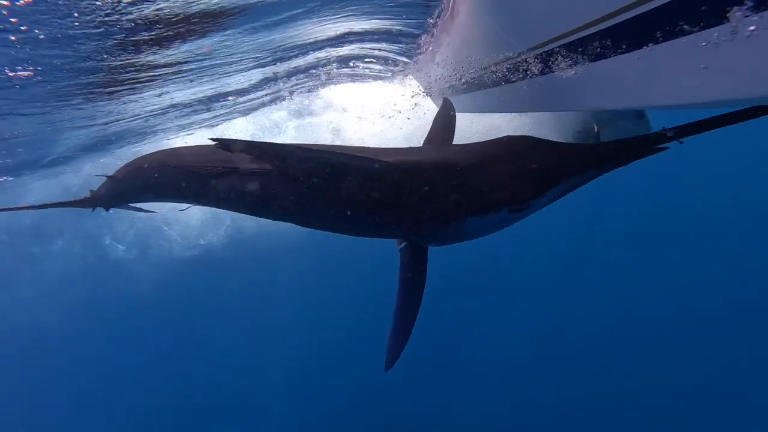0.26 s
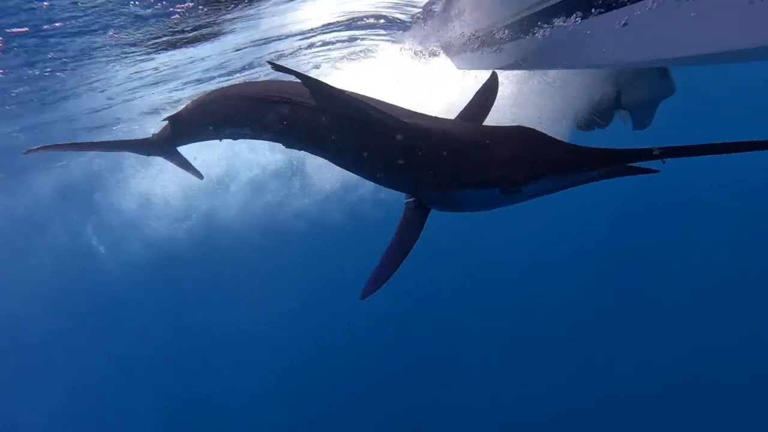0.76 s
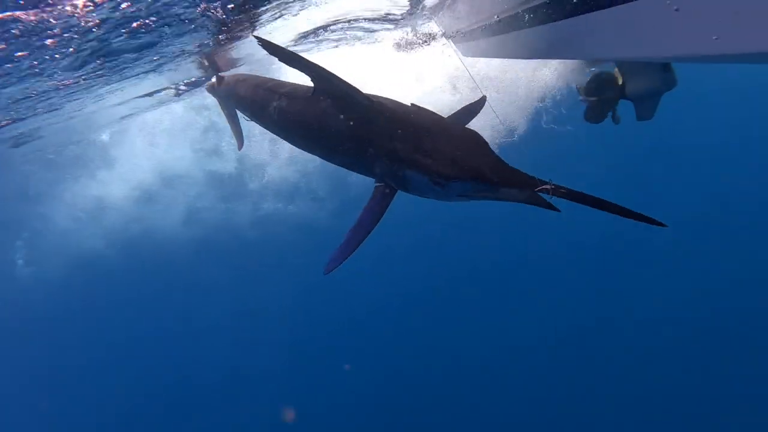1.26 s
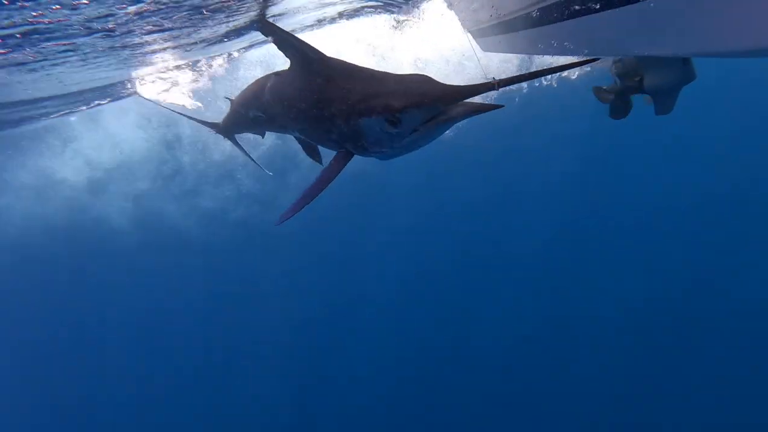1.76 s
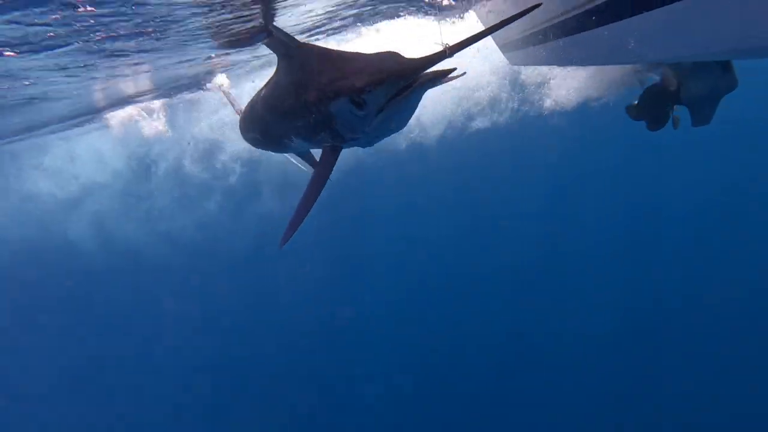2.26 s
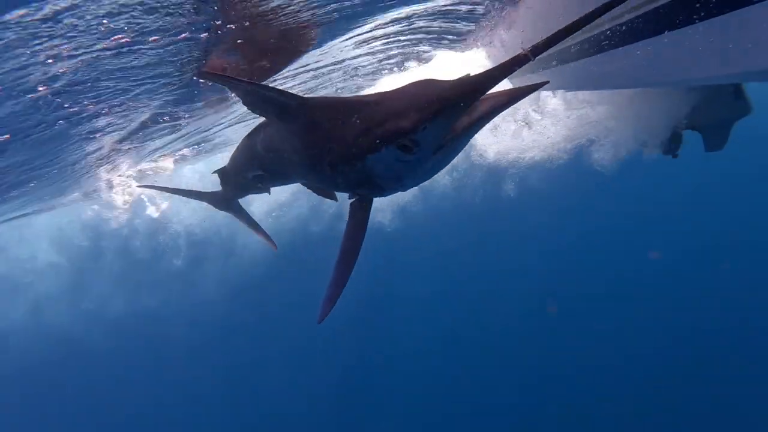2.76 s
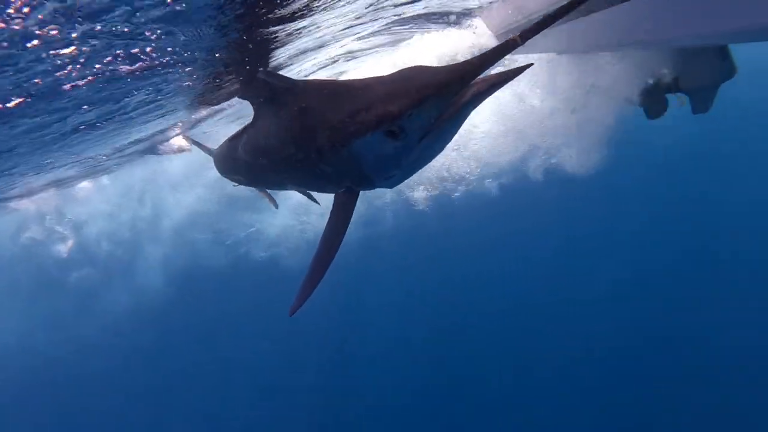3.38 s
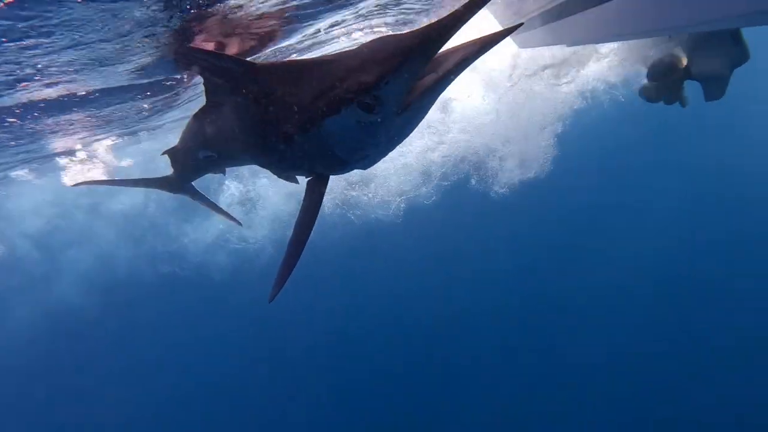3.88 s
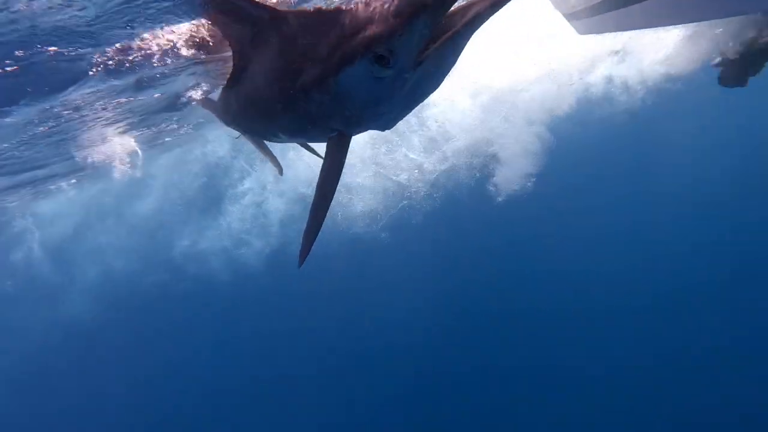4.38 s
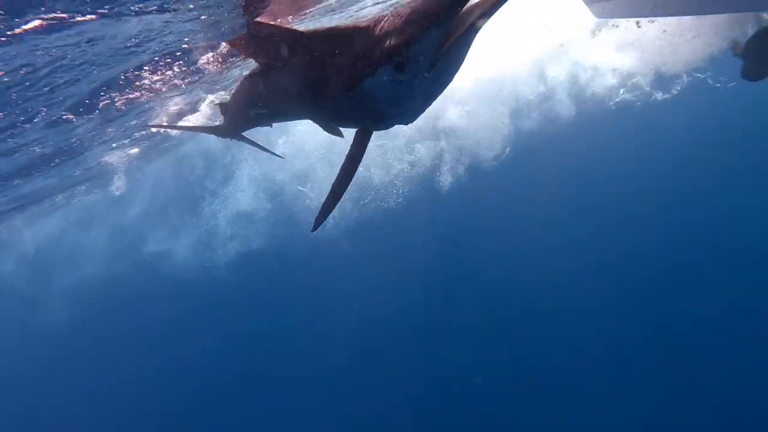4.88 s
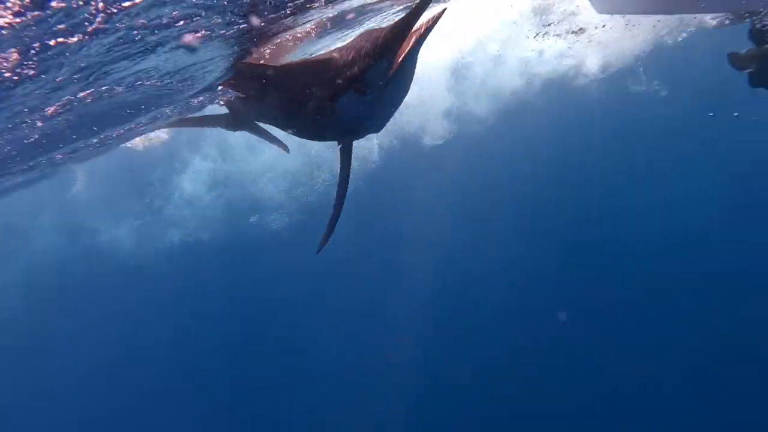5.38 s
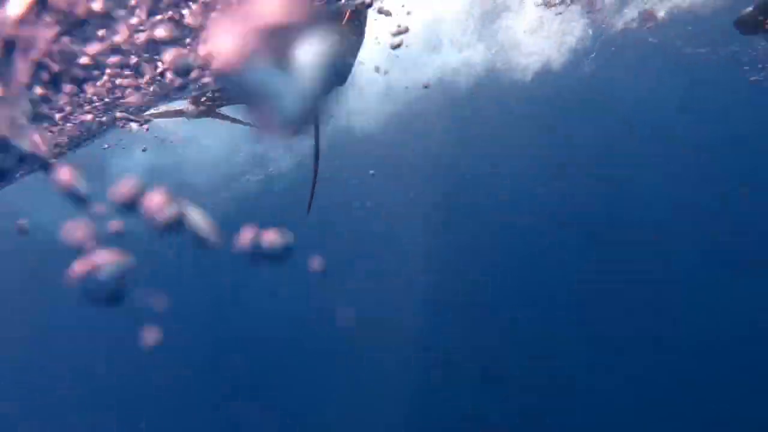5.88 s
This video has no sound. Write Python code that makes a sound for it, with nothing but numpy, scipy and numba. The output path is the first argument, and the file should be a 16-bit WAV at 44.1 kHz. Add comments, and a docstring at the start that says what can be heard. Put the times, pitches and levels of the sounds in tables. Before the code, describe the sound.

Close underwater sound, dull and centered: a steady low motor drone pulses rapidly through a boat hull, wrapped in turbulent water. Low buffeting thumps, rounded bubble plops and rising gurgles come and go irregularly. Light ticking spatters hit the microphone's casing, growing dense near the end with a rush of bubbles. An abrupt switch above water leaves a very short gust of wide stereo wind and hissing spray.

```python
"""Under water, from the start: an idling boat engine throbs and knocks through the hull as summed harmonics
and struck resonances. Water churns past as filtered noise and crowds of damped rings. Splashes spatter,
air pockets gurgle upward and single bubbles ring out; a sealed housing muffles it all alike in both channels.
At the end the sound cuts to the deck: wide wind and sea spray, as filtered noise in two channels."""
import sys
import numpy as np
from scipy import signal
from scipy.fft import rfft, irfft, next_fast_len
from scipy.io import wavfile
from scipy.ndimage import uniform_filter1d, minimum_filter1d
from numba import njit

SR = 44100
rng = np.random.default_rng(int(sys.argv[2]) if len(sys.argv) > 2 else 0)


def persist_wave(psi):
    """Save psi, clipped to +-1, as 16-bit WAV."""
    counts = np.round(np.clip(psi, -1, 1) * 32767).astype(np.int16)
    wavfile.write(sys.argv[1], SR, np.atleast_2d(counts).T)


N = 270761

# Levels are relative inside each source; spectrum tables set a shape only, as colour() restores the rms.

# slow hunting of the idle: t/s, f/Hz (turns per second)
IDLE_SPEED = [(0, 23.26), (.55, 23.33), (.9, 23.43), (1.35, 23.47), (1.85, 23.4), (2.05, 23.27),
              (2.55, 23.19), (2.85, 23.27), (3.2, 23.27), (3.4, 23.37), (3.65, 23.36), (4.05, 23.45),
              (4.6, 23.24), (4.8, 23.29), (5.15, 23.48), (5.5, 23.42), (6.14, 23.4)]
# engine hum through the hull: multiple of the turn rate, level/dB
HUM_HARMONICS = [(1, -18.5), (2, -31), (3, -29), (5, -44), (6, -37.5), (10, -38.5), (11, -38.5), (12, -42)]
# engine changes: t/s, throb level/dB, third multiple level/dB, upper hum level/dB, hull plate level/dB
ENGINE_LEVELS = [(0, -1, -1, 3.5, -9), (.5, -2, -1, -3, -11.5), (.75, 0.5, -2, 0.5, -7),
                 (1.3, 0.5, 4, 6.5, -3), (1.75, -0.5, 0, -3, -4.5), (2.25, 0.5, -2.5, 1.5, -6),
                 (2.6, -1.5, 3.5, 2.5, -1), (3, 2, 2, -4.5, -1), (3.3, 3, -10.5, 0, -1.5),
                 (3.8, -1.5, -9.5, 1.5, -12), (4.2, -3.5, 1.5, 0.5, -8), (4.75, -2, -11, 0, -7.5),
                 (5.2, 2.5, -2, -1.5, -13.5), (5.5, -3, -1, -5, -13), (5.96, -4, -4.5, -5.5, -3.5)]
# hull plate resonances: f/Hz, bandwidth/Hz, level/dB
HULL_PLATES = [(565, 28, -6), (653, 24, 0), (670, 160, -12), (773, 34, -5)]
# rush of water in the hull band: f/Hz, level/dB
RUSH_SPECTRUM = [(400, -6.5), (520, 9.5), (660, 16), (800, 14.5), (900, 5), (1100, -45), (2000, -86)]
# water around the housing: t/s, hull band level/dB, gurgle level/dB, fizz level/dB, crackle level/dB
WATER_LEVELS = [(0, -23.5, -24, -35, -65), (.6, -22.5, -28.5, -38.5, -72), (1.2, -23, -28.5, -39.5, -70.5),
                (1.8, -21.5, -33.5, -39, -70.5), (2.45, -24.5, -26, -38.5, -71),
                (3.0, -24, -28.5, -40, -71.5), (3.5, -22, -34, -35.5, -68), (4.05, -24, -24, -38, -70.5),
                (4.8, -23, -26.5, -36.5, -68), (5.1, -23.5, -27, -38, -70), (5.4, -22.5, -29, -38, -66),
                (5.7, -22.5, -36.5, -37, -69.5), (5.96, -32, -37.5, -36, -63.5)]
# surges that thump the housing: t/s, level/dB
SURGE_PUSHES = [(0.181, -22), (0.349, -25.5), (0.823, -25), (1.644, -26), (2.021, -33.5), (2.3, -32.5),
                (2.5, -30), (2.821, -25.5), (3.05, -30), (3.549, -33), (3.82, -20.5), (4.152, -24),
                (4.468, -18.5), (4.812, -24), (5.13, -26.5), (5.4, -33.5), (5.642, -23.5), (5.89, -23.5)]
# low buffeting: f/Hz, level/dB
BUFFET_SPECTRUM = [(8, -9.5), (20, -7.5), (50, 4), (130, -4.5), (200, -15.5), (400, -51), (800, -100)]
# large bubbles: f/Hz, level/dB
GURGLE_SPECTRUM = [(150, -1.5), (230, -11), (350, -3.5), (480, -1.5), (600, 2.5), (900, -30)]
# small bubbles: f/Hz, level/dB
FIZZ_SPECTRUM = [(700, -12), (950, -1), (1490, -6), (1650, -14.5), (1800, -37), (2500, -78)]
# smallest bubbles: f/Hz, level/dB
CRACKLE_SPECTRUM = [(1400, -21), (1750, 3), (2150, -8.5), (2450, -16.5), (4000, -12.5), (8000, -49),
                    (11000, -78.5)]
# hiss under the crackle: f/Hz, level/dB
WASH_SPECTRUM = [(1300, -51.5), (1750, -1.5), (1900, -5.5), (2070, 0.5), (2300, -18), (3000, -13),
                 (5000, -18.5), (9000, -19), (16000, -42)]
# sharp splashes on the housing: t/s, level/dB, treble level/dB re first level, mean delay of drops/s,
# housing ring level/dB re first level
HOUSING_SPLASHES = [(0.0464, -45, -13, 0.0021, -18), (0.3057, -50.5, -35.5, 0.0059, -8),
                    (0.3878, -53, -26, 0.0076, -0.5), (.5202, -51, -22, .007, 0.5),
                    (1.7295, -47, -22, .007, -1), (1.7519, -42, -27, 0.0087, -5),
                    (1.8183, -49.5, -16, 0.007, -7), (1.8627, -52, -18, .005, -3),
                    (1.9145, -48, -12, 0.0075, -6), (1.9424, -48, -8, 0.008, -9),
                    (2.0762, -36, -33, 0.0034, -7), (2.1121, -39.5, -32, 0.011, 1),
                    (2.364, -43, -22, 0.0047, -11.5), (2.542, -34.5, -18, 0.0098, -20),
                    (2.9073, -48, -32, .008, -1.5), (3.0126, -60, -25, .003, -8),
                    (3.456, -47.5, -12.5, 0.0089, -2.5), (3.5418, -51, -20, .007, -8),
                    (3.6267, -46, -29.5, 0.0062, -10.5), (4.4438, -54, -11, 0.0087, -1.5),
                    (4.5994, -52.5, -20.5, 0.008, -6), (5.2046, -51, -25, .008, -7),
                    (5.2515, -38, -28, 0.005, -8), (5.2639, -35, -23, 0.0096, -10),
                    (5.2879, -43.5, -18, .006, -1.5), (5.3158, -46.5, -9.5, .008, -4.5),
                    (5.3393, -48, -5, 0.0033, 2.5), (5.351, -52.5, -4, .004, -12),
                    (5.4206, -51, -20, .007, 2.5), (5.4495, -47, -18, 0.0046, -1),
                    (5.5049, -53, -24, 0.0078, 6), (5.6096, -45.5, -26, 0.0086, -3),
                    (5.63, -42.5, -25.5, 0.018, -5), (5.66, -44, -21, 0.011, -9),
                    (5.75, -44, -27, 0.021, -7.5), (5.6825, -36, -25.5, 0.0069, -10),
                    (5.7294, -41, -26, 0.015, -8), (5.7714, -40.5, -18, .005, -10),
                    (5.7942, -50, -32, 0.0094, -2.5), (5.845, -46, -29, .006, -8.5),
                    (5.8696, -43, -34, .005, -5), (5.897, -49, -13, .004, -9), (5.917, -44, -5, 0.0045, -6),
                    (5.9479, -46, -12, .005, -10)]
# shrinking air pockets: start t/s, length/s, first f/Hz, last f/Hz, level/dB
POCKET_SWEEPS = [(.08, .2, 540, 790, -23), (.42, .32, 540, 790, -22), (3.66, .16, 660, 760, -24),
                 (4.92, .24, 280, 680, -19.5), (5.15, .27, 570, 720, -20), (5.44, .14, 450, 780, -21),
                 (5.72, .23, 600, 1000, -22)]
# clearest single bubbles: t/s, starting f/Hz, level/dB
CLEAR_BUBBLES = [(.221, 770, -8.5), (.369, 432, -7.5), (.39, 695, -9.5), (0.427, 1110, -28),
                 (0.488, 1556, -30), (0.566, 1200, -22.5), (0.578, 1440, -29), (0.684, 947, -19),
                 (.7, 778, -11), (0.782, 1084, -20), (0.791, 1380, -24), (1.082, 1175, -23.5),
                 (1.084, 506, -7.5), (1.145, 568, -9), (1.24, 408, -5), (1.286, 1070, -21),
                 (1.33, 1484, -25), (1.432, 608, -8), (1.522, 662, -13), (1.639, 1100, -20.5),
                 (1.677, 1335, -22), (1.698, 3650, -61), (1.752, 2570, -51.5), (1.847, 1190, -13),
                 (1.864, 3340, -55.5), (2.16, 3590, -62), (1.946, 1474, -28.5), (2.111, 1165, -17.5),
                 (2.229, 584, -7.5), (2.703, 440, -12), (2.72, 964, -15.5), (2.916, 1406, -25.5),
                 (2.918, 938, -13.5), (3.024, 893, -16), (3.465, 1340, -23.5), (3.504, 658, -6.5),
                 (3.601, 1138, -18), (3.627, 990, -17.5), (3.655, 1016, -17), (3.72, 970, -18),
                 (3.736, 1550, -30.5), (3.799, 776, -11), (3.932, 340, -7), (4.01, 394, -10),
                 (4.063, 370, -10), (4.128, 228.6, -4), (4.2, 800, -9), (4.383, 400, -8.5),
                 (4.447, 1464, -23), (4.491, 1454, -23), (4.596, 1400, -21), (4.674, 1115, -17.5),
                 (4.729, 1240, -17.5), (4.83, 1083, -24.5), (4.877, 1080, -18.5), (4.881, 1283, -23),
                 (4.938, 1155, -20), (4.971, 399, -8.5), (4.975, 1450, -26.5), (5.121, 1194, -21),
                 (5.265, 1130, -15.5), (5.31, 1277, -20.5), (5.414, 370, -5.5), (5.526, 1350, -21.5),
                 (5.551, 764, -8), (5.6, 756, -10), (5.632, 812, -9.5), (5.652, 587, -5.5),
                 (5.678, 502, -2), (5.728, 1017, -15.5), (5.729, 1416, -23.5), (5.737, 689, -5),
                 (5.762, 903, -7.5), (5.808, 750, -7), (5.858, 4000, -58), (5.895, 934, -14),
                 (5.916, 1097, -13.5), (5.944, 1304, -19)]
# tone of the sealed housing, falling in the treble: f/Hz, level/dB
HOUSING_RESPONSE = [(2500, -14), (5000, -15.5), (9000, -27.5), (16000, -54)]
# deck: t/s, wind level/dB, spray level/dB
DECK_LEVELS = [(5.97, -52, -58), (5.99, -37, -41.5), (6.01, -31, -39), (6.07, -25, -36), (6.14, -28, -37.5)]
# wind common to both channels: f/Hz, level/dB
WIND_MID_SPECTRUM = [(30, -19), (121, -10), (259, -5), (364, -7.5), (600, -9), (1160, -14.5), (1600, -24.5),
                     (4000, -58)]
# wind opposite in the two channels: f/Hz, level/dB
WIND_SIDE_SPECTRUM = [(30, -25), (179, -6), (374, -8), (1860, -26), (4000, -60)]
# spray: f/Hz, level/dB
SPRAY_SPECTRUM = [(800, -17), (1600, -1.5), (3000, -2), (5000, -6), (7000, -4.5), (11500, -7.5),
                  (13500, -16), (16000, -19)]
# tone of the left port over the right: f/Hz, level/dB
LEFT_OVER_RIGHT = [(700, -2), (2000, 5), (4000, 3), (5500, 6), (16000, -4)]

START_TURN, KNOCK_TURN = .47, 0.09  # crank angle at the start and at the knock, in turns
WANDER_TURNS = .002  # rms unevenness of the idle
KNOCK_JITTER_S, HUM_SLIP_RAD = .00015, .35  # rms scatter of knock times and of hum phases
SURGE_S, EDDY_DB = 0.09, -30  # half length of a surge at 1/e; mean level of the eddies
WASH_DB = -6  # re crackle
SPLASH_HZ, SPLASH_T60_S = 2055, 0.074  # housing ring
SPATTER_DB, SPATTER_LOW_HZ, SPATTER_HIGH_HZ = 12.5, 873, 4850  # gain and pitch range of the drops
TREBLE_HZ, TREBLE_DB = 2540, 11  # drops above this pitch take the treble column plus this gain
SWEEP_WIDTH, SWEEP_CYCLES = .04, 30  # pitch scatter, plus or minus, as a share; T60 of a ring in cycles
# T60 at 1 kHz; power by which it shortens with pitch; log pitch climb over one T60
BUBBLE_T60_S, BUBBLE_SLOPE, BUBBLE_RISE = 0.055, 0.21, .2
CUT_S, FADE_IN_S = 5.968, .004
SIDE_DB = 2  # gain of the side wind
TOP_HZ = 16000  # low-pass edge


def undb(db):
    """Decibel law: amplitude gain is ten to the power dB / 20."""
    return 10 ** (np.asarray(db) / 20)


def level(x, db):
    """Root mean square: scale a signal to a given rms level in dB."""
    return x * undb(db) / np.sqrt(np.mean(x ** 2))


def curves(table):
    """Linear interpolation: columns of a time table, sample by sample."""
    s, *columns = np.transpose(table)
    return [np.interp(np.arange(N) / SR, s, c) for c in columns]


def colour(x, points):
    """Spectral filtering: weight the Fourier spectrum by (f/Hz, level/dB) points; rms 1."""
    hz, db = np.transpose(points)
    size = next_fast_len(N)
    log_hz = np.log(np.arange(size // 2 + 1) * SR / size + 1)
    gain = undb(np.interp(log_hz, np.log(hz), db))
    return level(irfft(rfft(x, size) * gain, size)[:N], 0)


def walk(rate):
    """Smoothed random steps: levels held 1 / rate s, averaged twice over that time; rms 1."""
    k = int(SR / rate)
    steps = np.repeat(rng.standard_normal(N // k + 1), k)
    return level(uniform_filter1d(uniform_filter1d(steps, k), k)[:N], 0)


@njit
def ring(s, hz, size, t60, rise, onset, count, sr):
    """Damped oscillation: rings set in over `onset` cycles, decay exponentially and climb in pitch."""
    out = np.zeros(count)
    for k in range(len(s)):
        w, phase, a = 2 * np.pi * hz[k] / sr, 0., size[k]
        steps, start, swell = int(t60[k] * sr * 1.3), int(s[k] * sr), onset * sr / hz[k]
        fade = np.exp(-np.log(1000) / (t60[k] * sr))
        climb = 1 + rise[k] / (t60[k] * sr)
        for i in range(min(steps, count - start)):
            attack = np.sin(np.pi / 2 * min(i / swell, 1.)) ** 2
            out[start + i] += a * attack * np.sin(phase)
            phase, w, a = phase + w, w * climb, a * fade
    return out


def swarm(rate, low_hz, high_hz, cycles, scatter_db, onset):
    """Superposition: a random crowd of bubble rings, `rate` a second, most small, a few large; rms 1."""
    when, pitch, size, rise = rng.random((int(rate * N / SR), 4)).T
    hz = low_hz * (high_hz / low_hz) ** pitch
    size_db = np.minimum(-scatter_db * np.log(1 - size), 4 * scatter_db)
    rings = ring(when * N / SR, hz, undb(size_db), cycles / hz, 0.47 * rise, onset, N, 1. * SR)
    return level(rings, 0)


def hum(turn, throb_db, third_db, upper_db):
    """Harmonic series: multiples of the turn rate waver as the water path changes; the highest swell together."""
    total = 0
    for k, db in HUM_HARMONICS:
        waver_db = (1.14 + 1.8 * (k > 1)) * walk(4)
        swell_db = throb_db * (k < 2) + third_db * (k == 3) + upper_db * (k > 8)
        slip = HUM_SLIP_RAD * (k > 1) * walk(3)
        total = total + np.sqrt(2) * undb(db + waver_db + swell_db) * np.cos(2 * np.pi * k * turn + slip)
    return total


def knock(turn, plate_db):
    """Struck resonance: one soft uneven blow a turn rings the hull plates; the rush of water swells each turn."""
    late = turn - KNOCK_TURN
    s = np.nonzero(np.diff(np.floor(late)))[0] / SR
    plates, one = 0, np.ones(len(s))
    for hz, width, db in HULL_PLATES:
        jitter, size = rng.standard_normal((len(s), 2)).T
        blow_s = np.maximum(s + KNOCK_JITTER_S * jitter, 0)
        t60 = np.log(1000) / np.pi / width  # a narrow resonance rings long
        plates = plates + ring(blow_s, hz * one, undb(db + 0.82 * size), t60 * one, 0 * one, 3.4, N, 1. * SR)
    gate = 1 + 0.23 * np.cos(2 * np.pi * (late - .15))
    rush = colour(rng.standard_normal(N), RUSH_SPECTRUM) * gate * undb(1.2 * walk(25))
    return (level(plates, 0) * undb(plate_db) + rush) * undb(-0.5)


def water(gurgle_db, fizz_db, crackle_db):
    """Turbulence and bubble resonance: eddies and surges buffet; large bubbles gurgle, small fizz, tiny crackle."""
    t = np.arange(N) / SR
    surges = sum(undb(db) * np.exp(-((t - s) / SURGE_S) ** 2) for s, db in SURGE_PUSHES)
    push = undb(EDDY_DB + 2.0 * walk(12)) + surges
    buffet = colour(rng.standard_normal(N), BUFFET_SPECTRUM) * push
    large = swarm(250, 207.2, 556, cycles=13, scatter_db=2.5, onset=2.5)
    gurgle = colour(large, GURGLE_SPECTRUM) * undb(0.3 * walk(3.6))
    small = swarm(1500, 850, 1750, cycles=46, scatter_db=4.5, onset=3.7)
    fizz = colour(small, FIZZ_SPECTRUM) * undb(2.0 * walk(9))
    smallest = swarm(500, 1800, 3600, cycles=26, scatter_db=5.0, onset=4.3)
    crackle = colour(smallest, CRACKLE_SPECTRUM) * undb(2.2 * walk(21))
    wash = undb(WASH_DB + 2.0 * walk(32)) * colour(rng.standard_normal(N), WASH_SPECTRUM)
    return buffet + gurgle * undb(gurgle_db) + fizz * undb(fizz_db) + (crackle + wash) * undb(crackle_db)


def splashes(count=40):
    """Impact excitation: a thick spatter of drops, the low ones strongest, with the housing ringing on."""
    s, db, treble_db, scatter_s, ring_db = np.transpose(HOUSING_SPLASHES)[:, :, None]
    late, pitch, tone = np.moveaxis(rng.random((len(s), count, 3)), 2, 0)
    hz = SPATTER_LOW_HZ * (SPATTER_HIGH_HZ / SPATTER_LOW_HZ) ** pitch
    late = -np.log(1 - late)  # exponential delays, mean 1
    tilt_db = (hz > TREBLE_HZ) * (treble_db + TREBLE_DB)
    size = undb(db + SPATTER_DB - 32 * pitch - 3.1 * late + tilt_db)
    drop_s, hz = (s + scatter_s * late).ravel(), hz.ravel()
    drops = ring(drop_s, hz, size.ravel(), 24 / hz, 0 * hz, 1.7, N, 1. * SR)
    s = s.ravel()
    shell_hz = SPLASH_HZ * (1 + 0.053 * (tone[:, 0] - .5))
    shell_size = undb(db + ring_db).ravel()
    shell = ring(s, shell_hz, shell_size, SPLASH_T60_S + 0 * s, 0.033 + 0 * s, 7.8, N, 1. * SR)
    return drops + shell


def sweeps(count=120):
    """Cavity resonance: a shrinking air pocket sheds a dense string of rings whose pitch climbs."""
    s, length_s, from_hz, to_hz, db = np.transpose(POCKET_SWEEPS)[:, :, None]
    along, off = np.moveaxis(rng.random((len(s), count, 2)), 2, 0)
    hz = from_hz * (to_hz / from_hz) ** along * (1 + 2 * SWEEP_WIDTH * (off - .5))
    # share the power among the rings, strongest midway
    power = np.sin(np.pi * along) * length_s * hz * 2 * np.log(1000) * 2 / (count * SWEEP_CYCLES)
    size = undb(db) * np.sqrt(power)
    ring_s, hz = (s + length_s * along).ravel(), hz.ravel()
    return ring(ring_s, hz, size.ravel(), SWEEP_CYCLES / hz, 0 * hz, 1.7, N, 1. * SR)


def bubbles():
    """Bubble resonance: each clear bubble climbs in pitch as it rings; small, high ones fade sooner."""
    s, hz, db = np.transpose(CLEAR_BUBBLES)
    t60 = BUBBLE_T60_S * (1000 / hz) ** BUBBLE_SLOPE
    return ring(s, hz, undb(db), t60, BUBBLE_RISE + 0 * s, 3.2, N, 1. * SR)


def housing(under):
    """Transmission loss: the sealed shell dulls the treble; the overall rms is kept."""
    return colour(under, HOUSING_RESPONSE) * np.std(under)


def deck():
    """Mid and side noise: gusty wind on two microphone ports; uncorrelated spray noise, brighter on the left."""
    wind_db, spray_db = curves(DECK_LEVELS)
    mid = colour(rng.standard_normal(N), WIND_MID_SPECTRUM) * undb(2.0 * walk(30))
    side = colour(rng.standard_normal(N), WIND_SIDE_SPECTRUM) * undb(2.0 * walk(30))
    flicker = undb(spray_db + 2.0 * walk(70))  # shared by both channels
    out = []
    for k in (1, -1):  # left, right
        wind = undb(wind_db) * (mid + k * undb(SIDE_DB) * side)
        port = wind + flicker * colour(rng.standard_normal(N), SPRAY_SPECTRUM)
        port = port * (np.arange(N) / SR > CUT_S - .05)
        tone = [(hz, k * db / 2) for hz, db in LEFT_OVER_RIGHT]
        out.append(np.std(port) * colour(port, tone))
    return np.array(out)


def scene():
    """Superposition and crossfade: all sources under water until the cut, then the deck."""
    t = np.arange(N) / SR
    *hum_db, plate_db = curves(ENGINE_LEVELS)
    turn = START_TURN + np.cumsum(curves(IDLE_SPEED)[0]) / SR + WANDER_TURNS * walk(2.5)
    hull_db, *water_db = curves(WATER_LEVELS)
    under = hum(turn, *hum_db) + undb(hull_db) * knock(turn, plate_db) + water(*water_db)
    under = housing(under + splashes() + sweeps() + bubbles())
    above = np.clip((t - CUT_S) / 0.0053 + .5, 0, 1)
    return under * np.minimum(t / FADE_IN_S, 1) * (1 - above) + deck() * above


def record(dry):
    """Gain reduction: the camera's limiter dips smoothly around the loudest peaks; a low-pass cuts the top."""
    hold = int(0.019 * SR)
    needed = np.minimum(1, undb(-4.5) / (np.abs(dry).max(axis=0) + 1e-9))
    gain = minimum_filter1d(needed, 3 * hold)
    gain = uniform_filter1d(uniform_filter1d(gain, hold), hold)
    low_pass = signal.ellip(8, .2, 70, TOP_HZ, fs=SR, output="sos")
    return signal.sosfilt(low_pass, dry * gain)


dry = scene()
out = record(dry)
persist_wave(out)
```